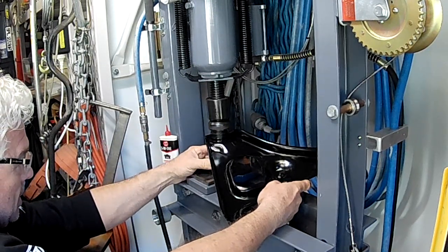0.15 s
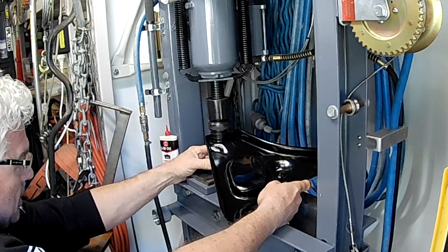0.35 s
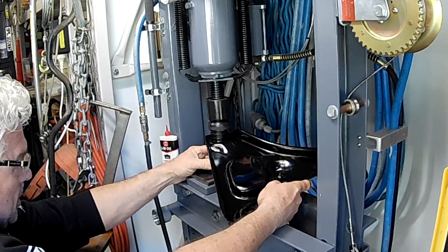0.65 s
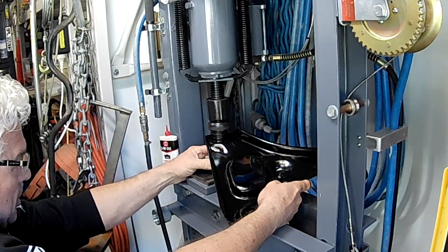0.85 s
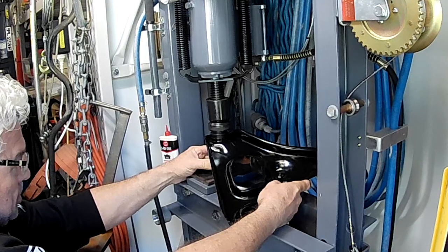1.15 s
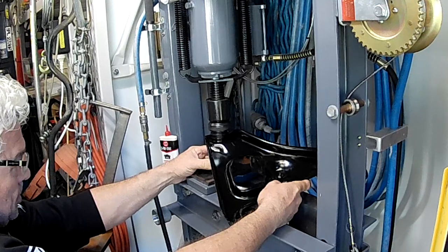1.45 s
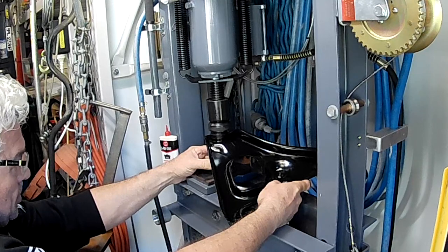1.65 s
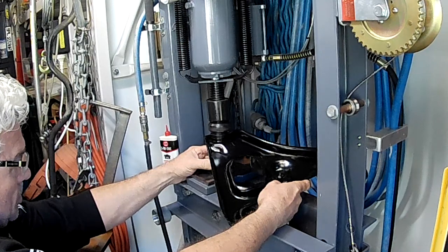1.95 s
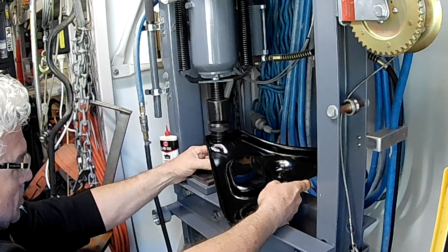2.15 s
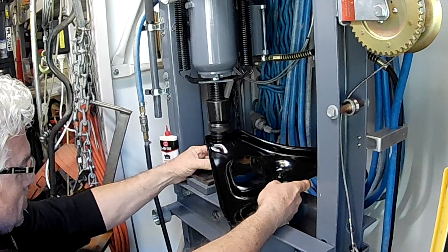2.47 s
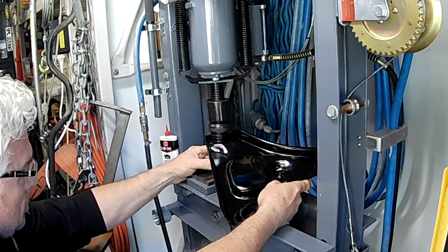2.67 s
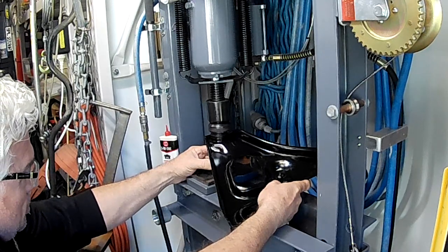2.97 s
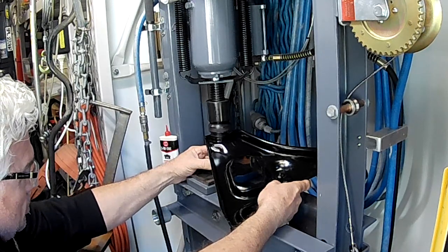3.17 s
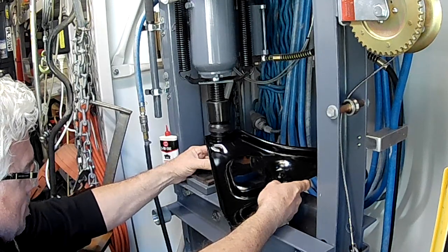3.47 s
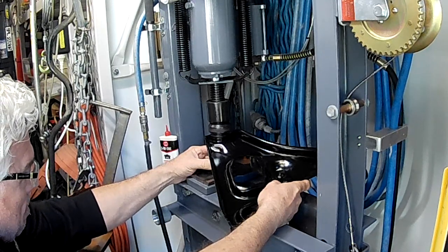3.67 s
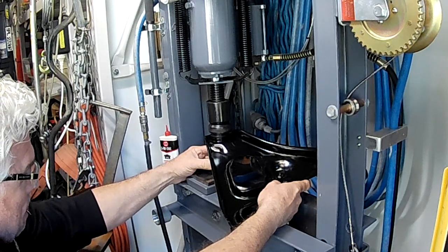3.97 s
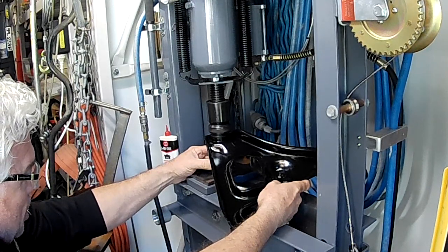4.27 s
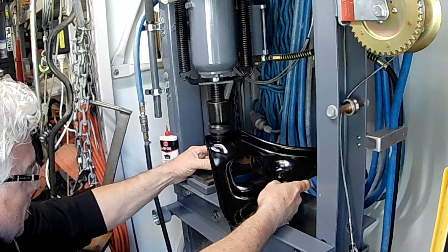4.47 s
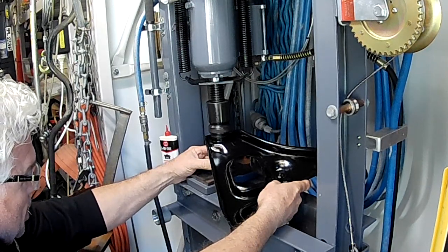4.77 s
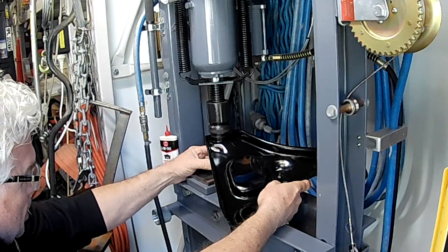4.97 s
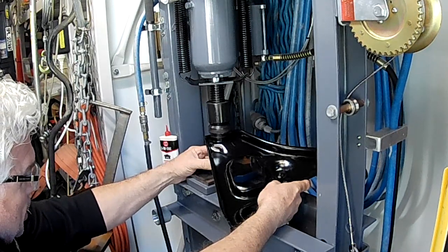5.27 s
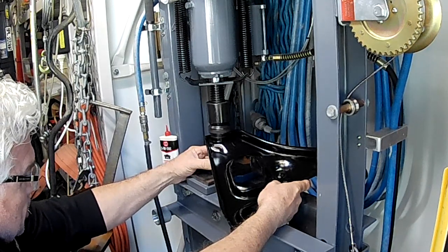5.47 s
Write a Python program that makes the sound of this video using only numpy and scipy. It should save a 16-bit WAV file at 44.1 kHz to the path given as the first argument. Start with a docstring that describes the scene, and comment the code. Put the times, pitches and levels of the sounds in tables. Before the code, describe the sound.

Fast, raspy air-exhaust bursts with low thuds beat about twelve times a second, easing to nine or ten, over a steady leaking hiss.

```python
"""A hiss and a hollow pop as an air valve opens, then the fast beat of an air-driven hydraulic pump.
The pump works a shop press; its piston cycles about nine to thirteen times a second, slower under load.
Each stroke puffs coloured noise through a muffler and thumps: pressure pulses ring the pump housing.
Air leaking past the valve is a steady noise hiss, a little louder close to each stroke.
Dense noise-like reflections make the small workshop, over a quiet noise background."""
import sys
import numpy as np
from scipy import signal
from scipy.io import wavfile
from scipy.ndimage import uniform_filter1d

SR = 44100
rng = np.random.default_rng(int(sys.argv[2]) if len(sys.argv) > 2 else 0)


def to_wav(s):
    """Save 16-bit WAV."""
    ch = np.atleast_2d(s).T  # columns
    pcm = np.round(np.clip(ch, -1, 1) * 32767)  # PCM
    wavfile.write(sys.argv[1], SR, pcm.astype(np.int16))


N = 247842


def gain_of(db):
    """Decibel law: 20 dB is a factor of ten in amplitude."""
    return 10 ** (np.asarray(db) / 20)


def evened(x):
    """Normalisation to an rms value of 1."""
    return x / np.sqrt(np.mean(x ** 2) + 1e-20)


def read(points, hz):
    """Interpolation of a spectrum along a logarithmic frequency axis."""
    f, value = np.transpose(points)
    return np.interp(np.log(hz + 1), np.log(f + 1), value)


def add(mix, s, sound):
    """Superposition: a sound is added to the mix from time s, in seconds."""
    start = max(round(s * SR), 0)
    part = mix[start:][:len(sound)]
    part += sound[:len(part)]


def colour(points, peaks=(), size=4096):
    """Minimum phase: a causal impulse response whose phase follows from its log spectrum."""
    hz = np.fft.rfftfreq(size, 1 / SR)
    db = read(points, hz)
    for f, width, lift in peaks:
        db = db + lift / (1 + (2 * (hz - f) / width) ** 2)
    both_sides_db = np.concatenate([db, db[-2:0:-1]])
    log_gain = np.log(gain_of(both_sides_db))
    response = np.exp(np.conj(signal.hilbert(log_gain)))
    return np.fft.ifft(response).real


def shaped(x, points, peaks=()):
    """Linear filtering: white noise takes on a spectrum and keeps its power."""
    taps = colour(points, peaks)
    return signal.oaconvolve(x, taps / np.linalg.norm(taps))[:N]


def ring(modes, t):
    """Modal synthesis: a struck body rings as a sum of exponentially dying sines."""
    return sum(gain_of(db - 60 * t / t60) * np.sin(2 * np.pi * hz * t) for hz, db, t60 in modes)


def exhaust(delay_s=.0002, rise_s=0.0043, open_s=0.025, fall_s=0.013, ragged_db=0.9,
            treble_hz=3500, open_spread=0.032, uneven_db=0.1):
    """Turbulent jet noise: an opening port releases air, harder under load, until the flow dies away."""
    # Turbulent exhaust air. Each row: frequency in Hz, spectral density in dB.
    exhaust_spectrum = [(40, -25), (170, -2.5), (330, -8), (560, -1), (1250, 0), (2100, 2.5), (3200, -10),
                        (3800, -7.5), (4200, -15), (5200, -13), (6600, -13), (7500, -20), (8400, -10.5),
                        (9600, -14)]
    # Peaks and dips of the muffler and its surroundings. Each row: frequency in Hz, width in Hz, lift in dB.
    muffler = [(255, 50, 2), (398, 35, 3.5), (596, 35, 4.5), (890, 60, 2), (1462, 40, 5), (1612, 35, -4),
               (1715, 100, 4), (2100, 45, -3), (2200, 65, 3.5), (2380, 70, -3), (2580, 60, 3),
               (2850, 50, 2.5), (3520, 70, 2), (3870, 160, 2), (4893, 60, 2.5), (5150, 100, 2),
               (5965, 40, 4), (8455, 110, 2.5)]
    # Gain of the exhaust's treble part. Each row: time in seconds, gain in dB.
    treble_gain = [(.17, 3.5), (.5, -2.5), (.85, -1.8), (1.4, 1.5), (2.6, 0.7), (4.6, 1), (5.6, 1.5)]
    # a slower stroke works against more pressure; the first has the full line pressure behind it
    free_cycle_s, free_puff_db, load_db_per_doubling, first_puff_db = .083, -24, 8, 0.7

    t = np.arange(SR // 8) / SR
    lowpass = signal.butter(1, treble_hz, fs=SR)
    air = np.zeros(N)
    for k, (s, cycle_s) in enumerate(strokes()):
        load_db = load_db_per_doubling * np.log2(cycle_s / free_cycle_s)
        puff_db = free_puff_db + load_db + first_puff_db * (k == 0)
        body_db = uneven_db * rng.standard_normal()
        treble_db = np.interp(s, *np.transpose(treble_gain))

        shut_s = open_s * (1 + open_spread * rng.standard_normal())
        flow = np.tanh(t / rise_s) * np.exp(-np.maximum(t - shut_s, 0) / fall_s)
        jet, eddies = rng.standard_normal((2, len(t)))
        # eddies make the jet sputter within a few milliseconds
        sputter = gain_of(ragged_db * evened(uniform_filter1d(eddies, size=100)))
        puff = jet * flow * sputter

        body = signal.lfilter(*lowpass, puff)
        treble = puff - body
        balanced = gain_of(body_db) * body + gain_of(treble_db) * treble
        add(air, s + delay_s, gain_of(puff_db) * balanced)
    return shaped(air, exhaust_spectrum, muffler)


def thumps(width_s=.0016, travel_spread=0.017, uneven_db=0.05):
    """Impulse excitation: each blow is one swing of pressure that sets the housing ringing."""
    # Low ring of the pump housing and floor. Each row: frequency in Hz, level in dB, t60 in seconds.
    housing = [(45, -41, 0.14), (77.5, -6, 0.073), (127.3, -3.5, 0.14)]
    # Port opens, rebound, piston stops, rebound.
    # Each row: time after the stroke's start in seconds, pulse level in dB, ring level in dB.
    blows = [(.0018, -28.5, -38), (.0063, -43, -35), (0.0302, -44, -32.5), (0.046, -41.5, -61)]
    # Strength of the thumps over time; the ring is loudest when a multiple of the stroke rate meets
    # the housing's resonance. Each row: time in seconds, pulse gain in dB, ring gain in dB.
    strength = [(.17, 6.5, -12), (.27, -1, -6), (.95, 0, 1.5), (1.55, -3.5, 5.5), (2.3, -0.5, 1),
                (3.4, 3, -2.5), (4.3, 2, -3), (5.6, 3, -5)]

    lead = SR // 100  # samples ahead of the stroke, room for the pulse's first half
    t = np.arange(-lead, SR // 4) / SR
    when, push_db, boom_db = np.transpose(strength)
    out = np.zeros(N)
    for s, _ in strokes():
        # the piston's force and travel time vary a little
        push_gain = gain_of(np.interp(s, when, push_db) + uneven_db * rng.standard_normal())
        ring_gain = gain_of(np.interp(s, when, boom_db))
        travel = 1 + travel_spread * rng.standard_normal()
        for at, pulse_db, ring_db in blows:
            age = t - at * travel
            swing = age / width_s * np.exp((1 - (age / width_s) ** 2) / 2)  # peaks at 1
            pulse = gain_of(pulse_db) * swing
            boom = gain_of(ring_db) * ring(housing, np.maximum(age, 0))
            add(out, s - lead / SR, push_gain * pulse + ring_gain * boom)
    return out


def air_valve(pop_s=.091, pop_db=-34, lift_db=8.5, lift_s=0.0098):
    """Leakage noise and modal ringing: air hisses past the valve, which opens with a hollow pop."""
    # Air leaking past the valve, without the lift near strokes. Each row: time in seconds, level in dB.
    leak = [(0, -73), (.05, -78.5), (.07, -53), (.092, -40), (.12, -45.5), (.16, -46), (.3, -46),
            (5.62, -46.5)]
    # Colour of the leak. Each row: frequency in Hz, spectral density in dB.
    leak_spectrum = [(100, -26), (500, -4.5), (1200, -6.5), (2100, 3.5), (3100, -2), (3900, -5), (5200, -5),
                     (7400, -9.5), (8700, -3.5), (11000, -3), (16000, -9)]

    t = np.arange(N) / SR
    # the hiss is a little louder close to each stroke
    nearness = sum(np.exp(-abs(t - start) / lift_s) for start, _ in strokes())
    level_db = np.interp(t, *np.transpose(leak)) + lift_db * nearness
    hiss = shaped(rng.standard_normal(N), leak_spectrum) * gain_of(level_db)
    # Each row: frequency in Hz, level in dB, t60 in seconds.
    pop_modes = [(506, -2.0, 0.056), (625, -11, 0.058), (1050, -8, 0.035)]
    add(hiss, pop_s, gain_of(pop_db) * ring(pop_modes, t[:SR // 5]))
    return hiss


def strokes():
    """Reciprocating motion: each stroke starts as the cycle before it ends; rows of (start s, cycle s)."""
    # Time the piston takes for one cycle under the load. Each row: time in seconds, cycle in seconds.
    cycle = [(.17, .08226), (.25, .07842), (.6, .08324), (1.5, .08537), (3, .09009), (3.8, .09589),
             (4.8, .10712), (5.1, .107), (5.5, .10247)]
    rows, s = [], .1675  # first start in seconds
    while s < N / SR:
        cycle_s = np.interp(s, *np.transpose(cycle))
        rows.append((s, cycle_s))
        s += cycle_s
    return rows


def workshop(x, count=12, size=512):
    """Diffuse reverberation: dense reflections vary at random so no fixed colouring builds up."""
    z = signal.stft(x, nperseg=size)[2]
    tail_number = rng.integers(0, count, z.shape[1])  # one room tail for each moment
    heard = x
    for k in range(count):
        part = signal.istft(z * (tail_number == k), nperseg=size)[1][:N]
        heard = heard + signal.fftconvolve(part, room_tail())[:N]
    return heard


def room_tail(first_s=0.0044, taps_per_s=5000):
    """Reverberant decay: dense reflections off close walls and steel, each band dying at its own speed."""
    # Workshop reverberation time. Each row: frequency in Hz, t60 in seconds.
    room = [(100, 0.35), (350, 0.19), (2000, 0.2), (4500, 0.15), (8500, 0.077), (16000, 0.28)]
    # Level of the reverberation. Each row: frequency in Hz, level in dB.
    wet = [(100, 0), (350, 0.5), (900, 2), (2000, -3.5), (5000, 4), (8500, -8), (13000, -6)]

    count = SR // 2
    signs = rng.choice([-1., 1.], count)
    present = rng.random(count) < taps_per_s / SR
    taps = signs * present * (np.arange(count) > first_s * SR)
    hz, t, z = signal.stft(taps, SR, nperseg=256)
    decay = gain_of(-60 * t / read(room, hz)[:, None])
    # equal power in every band, so that the wet level alone sets it
    decay /= np.sqrt(np.mean(decay ** 2, axis=1, keepdims=True))
    decay *= gain_of(read(wet, hz))[:, None]
    return signal.istft(z * decay, SR, nperseg=256)[1] / np.linalg.norm(taps)


def background(level_db=-54):
    """Stationary noise: the quiet workshop is steady noise of fixed spectrum."""
    # Workshop background. Each row: frequency in Hz, spectral density in dB.
    floor_spectrum = [(25, -1), (60, 14), (140, 1), (300, -9), (1000, -14), (2800, -19), (3950, -5),
                      (5200, -19), (9000, -38), (16000, -62)]
    return gain_of(level_db) * shaped(rng.standard_normal(N), floor_spectrum)


def scene():
    """Superposition: air sounds in the room, the direct thumps and the background add up."""
    return (workshop(exhaust() + air_valve()) + thumps() + background())[None]


def record(dry):
    """Frequency response: the microphone loses the deepest bass and top treble, then a band limit cuts."""
    # Microphone response. Each row: frequency in Hz, gain in dB.
    microphone = [(5, -16), (25, -1.5), (9600, 3), (10000, -13), (13000, -15), (15500, -21)]
    edge_hz = 15700
    heard = signal.oaconvolve(dry, colour(microphone)[None])[:, :N]
    band_limit = signal.firwin(511, edge_hz, window=("kaiser", 9), fs=SR)
    return signal.oaconvolve(heard, band_limit[None], "same")


dry = scene()
out = record(dry)
to_wav(out)
```